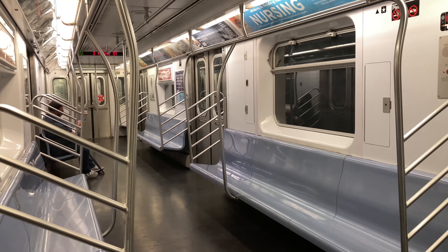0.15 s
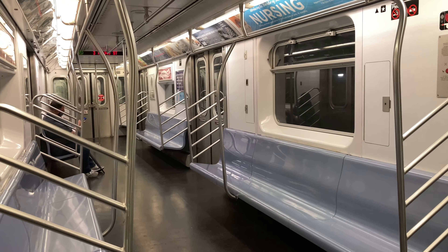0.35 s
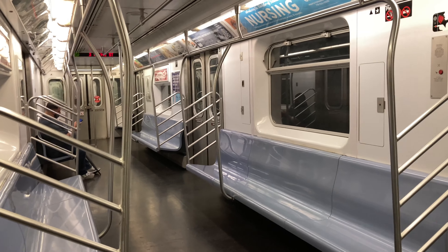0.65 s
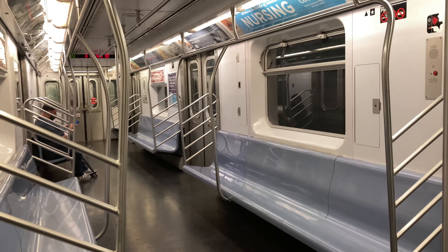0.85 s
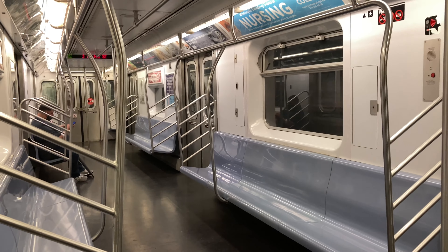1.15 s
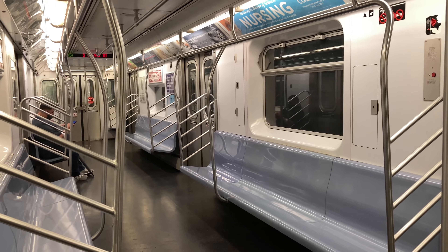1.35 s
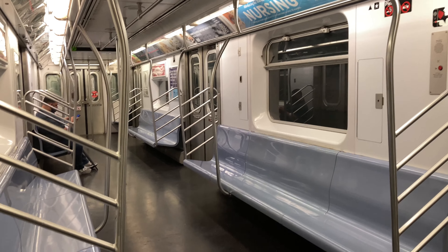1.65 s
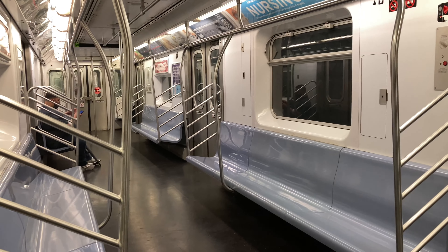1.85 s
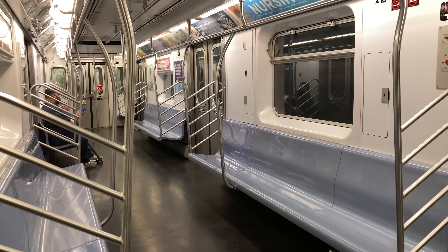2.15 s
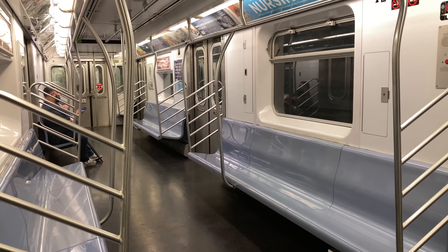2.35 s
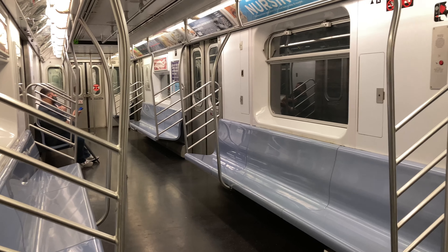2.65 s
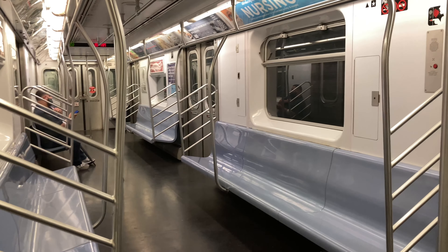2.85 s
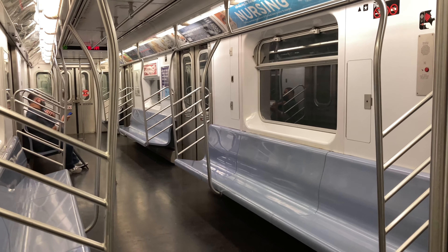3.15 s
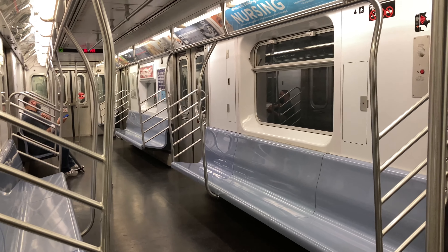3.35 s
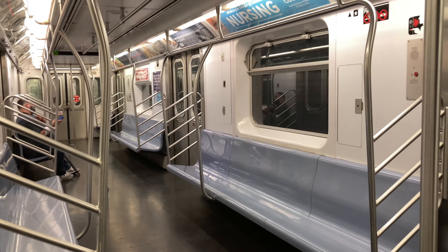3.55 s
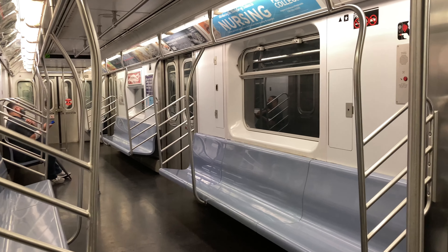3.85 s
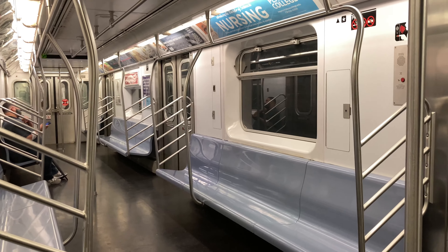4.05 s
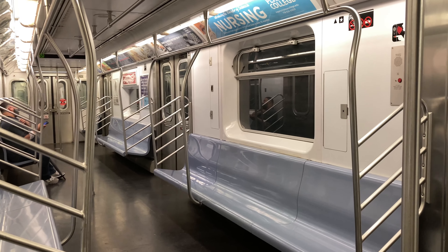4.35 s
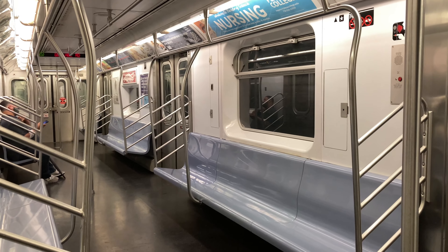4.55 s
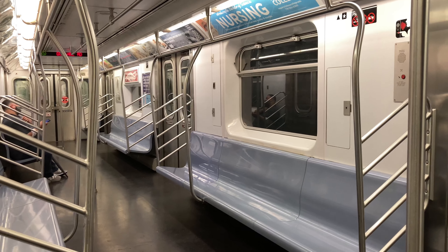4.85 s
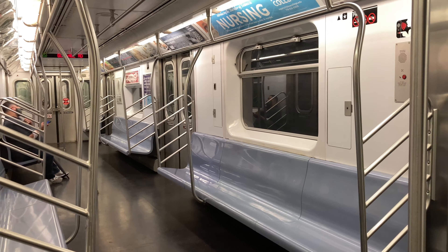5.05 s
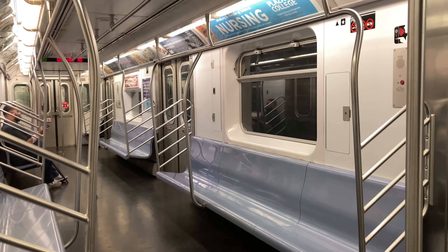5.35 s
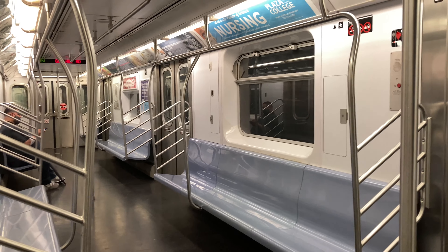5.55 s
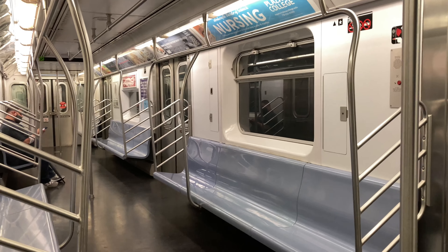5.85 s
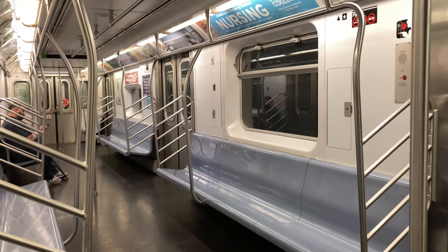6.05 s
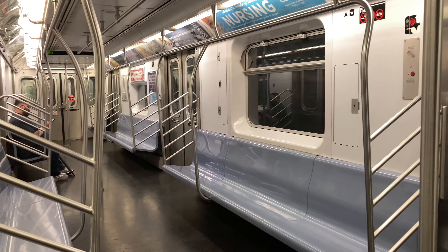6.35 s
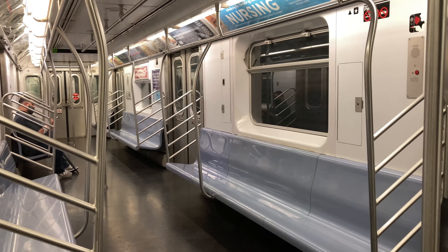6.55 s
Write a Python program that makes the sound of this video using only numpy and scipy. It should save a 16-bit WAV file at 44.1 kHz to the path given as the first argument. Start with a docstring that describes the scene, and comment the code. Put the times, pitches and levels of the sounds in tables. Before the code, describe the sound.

Heard from inside a nearly empty subway car in a tunnel, in wide stereo: continuous deep rumble, droning body, wheel roar and rushing air. Light metallic rattles come early, then floor thumps before two seconds. A dense burst of jolts around three seconds makes the wheels rasp and ring; another sharp jolt with a steel clash lands near four. Afterwards the ride evens out, with faint squeals and a late hiss.

```python
"""Subway ride through a tunnel

Heard inside the car, at two closely spaced microphone ports. Air rushes past and electronics whine faintly.
The trucks rumble and the car body drones: noise passed through low resonances. The wheels roar, rasp,
ring and hiss: noise that follows the roughness of the rail. Dull jolts are single pulses that ring the floor.
Flanges squeal briefly, panels boom, and loose steel fittings clash: short swells or bursts of filtered noise."""
import sys
import numpy as np
from scipy import signal
from scipy.fft import rfft, irfft, next_fast_len
from scipy.io import wavfile
from scipy.ndimage import uniform_filter1d, minimum_filter1d, map_coordinates

SR = 44100
rng = np.random.default_rng(int(sys.argv[2]) if len(sys.argv) > 2 else 0)


def put_to_file(sound):
    """Save the sound as 16-bit audio at rate SR, in the file named by the first command-line argument."""
    columns = np.atleast_2d(sound).T  # one column per channel
    safe = np.clip(columns, -1, 1)
    whole_steps = np.round(safe * 32767)
    wavfile.write(sys.argv[1], SR, whole_steps.astype(np.int16))


N = 295911  # length in samples

# All levels are relative until the layers are mixed.
# Air rushing past, its spectrum: f/Hz, level/dB
AIR_SPECTRUM = [(250, -9.5), (550, -2.5), (700, -5), (830, -5), (1100, -8), (1500, -9.5), (3000, -20.5),
                (8000, -99)]
# Whine of the traction electronics: f/Hz, rms level/dB before it wavers
WHINE_LINES = [(10343, -68.5), (10525, -61.5)]
# Wheel modes that sing when rubbed: middle t/s, length/s, f/Hz, width/Hz of one filter pass, level/dB
FLANGE_SQUEALS = [(.12, .45, 3700, 300, -41), (.47, .16, 4000, 400, -38), (.68, .22, 3680, 200, -43),
                  (1.0, .22, 3460, 260, -40.5), (2.0, .6, 2570, 300, -40), (2.58, .14, 5820, 160, -53),
                  (2.75, .26, 5450, 200, -46.5), (3.1, .2, 5280, 300, -47), (3.55, .3, 5780, 200, -49),
                  (4.03, .45, 8100, 600, -41.5), (4.85, 0.84, 6200, 240, -46.5), (5.11, .2, 6190, 190, -41),
                  (5.25, .34, 6160, 200, -46), (6.15, .8, 3700, 1000, -41), (6.68, .3, 7400, 140, -53.5)]
# Loose steel fittings clashing: t/s, level/dB
STEEL_CLASHES = [(0.424, -29), (.6, -38), (.84, -41), (1.63, -35), (1.8, -31.5), (2.66, -35), (3.06, -39),
                 (3.918, -26), (4.11, -33)]
# Spectrum of a clash: f/Hz, level/dB
STEEL_SPECTRUM = [(500, 2), (1400, 8), (2600, 15), (4300, 12.5), (6800, 3.5), (8300, 4.5), (9500, -6),
                  (12500, 0), (15000, -19)]
# Blows from the track: t/s, level/dB
TRACK_BLOWS = [(1.558, -9.5), (1.696, -8), (1.796, -10), (1.944, -3.5), (2.123, -20), (2.196, -10),
               (2.753, -6), (2.841, -8), (2.866, -3.5), (3.008, -1.5), (3.059, -3), (3.086, -9),
               (3.152, -7), (3.212, -4.5), (3.231, -4), (3.243, -8), (3.252, -9), (3.921, -5), (3.944, -24),
               (4.104, -7), (4.215, -6), (4.448, -19), (5.486, -16), (5.708, -10.5)]
# Floor resonances rung by the blows: f/Hz, width/Hz, level/dB
FLOOR_MODES = [(75, 20, -7.5), (268.4, 29, 1), (405, 69, -4.5)]
# Panels set booming by the track: middle t/s, length/s, f/Hz, width/Hz of one filter pass, level/dB
PANEL_BOOMS = [(.3, .26, 72, 24, -18.5), (.52, 0.14, 80, 20, -16), (.76, .2, 80.5, 22, -18.5),
               (.42, .2, 220, 80, -23), (.76, .22, 250, 110, -22), (1.22, 0.76, 81.4, 12, -16.5),
               (1.55, 0.35, 330, 140, -22), (1.65, 0.15, 83, 9.1, -16.5), (1.7, .18, 130, 26, -22),
               (1.84, 0.15, 198, 15, -16.5), (1.96, 0.166, 391, 55, -22), (2.12, .3, 280, 130, -24),
               (2.35, 0.14, 124, 25, -20), (2.69, .18, 124.7, 17, -17.5), (2.82, 0.48, 325, 130, -15.5),
               (2.92, 0.22, 76, 26, -22), (3.15, 0.37, 293, 114, -16.5), (3.1, .2, 63.3, 40, -17),
               (3.95, .17, 300, 120, -14), (4.17, 0.44, 300, 90, -20.5), (5.51, 0.19, 60, 33, -17),
               (5.49, .16, 122, 14, -19.5), (5.96, .15, 71.7, 24, -21.5), (6.14, 0.17, 120.6, 12, -19),
               (6.33, .15, 121, 12, -20), (6.6, .13, 85, 40, -21.5), (6.68, .16, 315, 30, -21)]
# How hard the trucks shake the car: t/s, level/dB
TRUCK_SHAKING = [(0, -20.5), (.3, -22), (1.5, -24), (2.1, -25), (2.4, -23.5), (3.2, -28), (3.6, -29),
                 (4.4, -29.5), (5.3, -27.5), (5.7, -23), (6.2, -27), (6.71, -26)]
# Rumble of the trucks, its spectrum: f/Hz, level/dB
RUMBLE_SPECTRUM = [(12, -30), (25, -14), (40, 0.5), (62, 3.5), (75, 4), (92, 0), (105, -1), (150, -3),
                   (300, -29)]
# Resonances of the car's shell: f/Hz, width/Hz, level/dB
SHELL_MODES = [(123.8, 10.5, 0), (167, 33, -14), (190, 9.6, -4)]
# Roughness of the rail under the wheels: t/s, level/dB
RAIL_ROUGHNESS = [(0.0, -32), (0.32, -31), (0.39, -31.5), (0.46, -29), (0.64, -28.5), (1.04, -31),
                  (1.35, -30.5), (1.5, -29), (1.83, -27), (2.12, -26), (2.52, -31.5), (2.65, -30.5),
                  (2.69, -27), (2.83, -28), (2.87, -24.5), (3.04, -25), (3.07, -23.5), (3.19, -27),
                  (3.24, -25.5), (3.29, -27), (3.42, -27.5), (3.53, -31.5), (3.7, -34), (3.81, -31),
                  (3.85, -32.5), (3.925, -23.5), (4.06, -26.5), (4.12, -25.5), (4.45, -31.5), (5.27, -32),
                  (6.0, -28.5), (6.45, -31.5), (6.71, -29.5)]
SMOOTH_RAIL_DB = -31.5  # roughness of ordinary rail
# Spectra of wheel roar, rasp and hiss: f/Hz, level/dB
ROAR_SPECTRUM = [(100, -24), (165, -4.5), (225, -2), (255, -1), (274, 0), (290, -.5), (310, 0), (340, -2.5),
                 (390, -4), (500, -7), (600, -10), (720, -14), (1000, -18), (5000, -62)]
RASP_SPECTRUM = [(400, -17), (700, 2.5), (830, 3), (1050, 1), (1400, -0.5), (2000, 1.5), (2400, 0),
                 (2700, 0.6), (3200, -3.5), (4300, -7), (5200, -15), (6500, -15), (10000, -53)]
HISS_SPECTRUM = [(3000, -12), (4600, -3), (5500, -.5), (7000, -0.5), (8300, 0), (9300, -1.5), (10300, -3),
                 (11500, -5), (13000, -7.5), (14500, -22), (16000, -22)]
# Wheel resonances that ring on rough rail: f/Hz, width/Hz of one filter pass, level/dB
WHEEL_MODES = [(2600, 440, 4), (4410, 520, -0.5), (5190, 610, -3.5)]
# Rough spots where the rasp surges: middle t/s, length/s, level/dB
RASP_SURGES = [(.45, .12, -31), (.63, .07, -33), (1.82, .07, -26), (2.89, 0.098, -31), (3.075, .07, -25),
               (3.24, .05, -30), (3.96, .12, -26.5), (4.12, .05, -31)]
# Flanges brushing the rail with a dry hiss: middle t/s, length/s, level/dB
FLANGE_BRUSHES = [(0.107, 0.42, -44.5), (.66, .3, -50), (1.5, 0.45, -42), (3.6, 0.19, -46),
                  (4.08, 0.45, -52), (5.6, 1, -50), (6.335, 0.76, -39)]
# How layers follow the rail: start level/dB on ordinary rail, change/dB per dB of roughness, drift/(dB/s)
BOOM_LAW = (-27.5, 0.036, -1.07)
DRONE_LAW = (-23.5, -0.1, 0.11)
ROAR_LAW = (-19.5, 1.08, -0.62)
RASP_LAW = (-30.5, 1.15, -0.049)
RING_LAW = (-51, 2.8, -0.2)
HISS_LAW = (-47.5, 1, -.05)
# Likeness of the two ports: f/Hz, likeness from -1 to 1 (larger values count as nearly 1)
PORT_LIKENESS = [(110, 1), (130, 0.95), (290, 0.83), (520, 0.7), (700, 0.05), (850, 0.34), (1150, 0.42),
                 (1550, -0.3), (2000, -0.23), (2500, 0.09), (5800, 0), (6700, 0.2), (8000, 6), (9000, 9),
                 (13000, 18)]
# Phase by which the left port leads: f/Hz, lead/radians
PORT_LEAD = [(150, 0), (350, .3), (1200, .1), (4500, 0), (6200, 1.2), (7100, 0), (9150, -3.14),
             (11400, -6.28), (13600, -9.42), (15400, -12.5)]
# Left level minus right level: f/Hz, difference/dB
PORT_TILT = [(60, -1), (110, 1), (200, 3), (380, -0.1), (700, 3), (1290, 2), (2380, 0.5), (4400, -0.3),
             (8120, -1), (15000, 0)]
TOP_HZ = 15600  # band limit of the recorder


def amp(db):
    """Turn decibels into a gain."""
    return 10 ** (np.asarray(db) / 20)


def unit(x):
    """Scale a signal to rms 1."""
    return x / np.sqrt(np.mean(x ** 2) + 1e-20)


def along(points, hz):
    """Read a (frequency, value) table on a logarithmic frequency axis."""
    f, values = np.transpose(points)
    return np.interp(np.log(hz + 1), np.log(f + 1), values)


def over_time(rows):
    """Draw a (time, level) table as one value per sample."""
    seconds, levels = np.transpose(rows)
    return np.interp(np.arange(N) / SR, seconds, levels)


def wobble(rate):
    """Make a smooth random curve through `rate` random points a second."""
    knots = rng.standard_normal(int(N * rate / SR) + 4)
    return map_coordinates(knots, [np.arange(N) * rate / SR])


def arch(middle, length):
    """Rise and fall smoothly over `length` seconds around `middle`."""
    return np.cos(np.pi * np.clip((np.arange(N) / SR - middle) / length, -.5, .5))


def arches(rows):
    """Add up the arches of (middle, length, level) rows."""
    return sum(amp(db) * arch(middle, length) for middle, length, db in rows)


def filtered(x, response):
    """Filter x by multiplying its spectrum with a response that depends on frequency."""
    size = next_fast_len(N + SR // 2)  # spare room lets the ringing end
    hz = np.fft.rfftfreq(size, 1 / SR)
    return irfft(rfft(x, size) * response(hz), size)[..., :N]


def colour(points):
    """Make a filter from a spectrum table; it falls off steeply around the last frequency and above."""
    last_hz = points[-1][0]
    return lambda hz: amp(along(points, hz)) / (1 + (hz / last_hz) ** 8)


def resonances(modes):
    """Make a filter that rings at each (frequency, width, level) mode, with alternating signs."""
    def response(f):
        total = 0
        for k, (centre, width, db) in enumerate(modes):
            damping = 1j * f * width
            total = total + (-1) ** k * amp(db) * damping / (centre ** 2 - f ** 2 + damping)
        return total
    return response


def rush(response, patchy_db):
    """Make two noises, rms 1 together, whose narrow pitch bands flare and fade at random."""
    z = signal.stft(rng.standard_normal((2, N)), nperseg=2048)[2]
    patches = uniform_filter1d(rng.standard_normal(z.shape[1:]), size=3, axis=0)  # across pitch
    patches = uniform_filter1d(patches, size=6, axis=1, mode="wrap")  # across time
    pair = signal.istft(z * amp(patchy_db * unit(patches)), nperseg=2048)[1][:, :N]
    return unit(filtered(pair, response))


def sustained(pair, span):
    """Hold the strength of a vibration nearly even, judged over `span` seconds."""
    power = np.abs(uniform_filter1d(pair ** 2, size=int(span * SR), axis=1))
    return pair / np.sqrt(power + 1e-3)


def swells(rows):
    """Let noise drive one resonance per row, swelling and fading over its length."""
    total = np.zeros((2, N))
    for middle, length, hz, width, db in rows:
        b, a = signal.iirpeak(hz, hz / width, SR)
        once = signal.lfilter(b, a, rng.standard_normal((2, N)))
        twice = signal.lfilter(b, a, once)
        total += amp(db) * arch(middle, length) * sustained(unit(twice), span=0.2)
    return total


def ride(law):
    """Give a layer's level in dB: it follows the roughness of the rail and drifts steadily."""
    level_db, growth, drift_db_per_s = law
    roughness_db = over_time(RAIL_ROUGHNESS) - SMOOTH_RAIL_DB
    return level_db + growth * roughness_db + drift_db_per_s * np.arange(N) / SR


def tunnel_air():
    """Air rushes between car and tunnel wall: noise that buffets slightly and slowly eases."""
    level_db = np.linspace(-30.5, -33.5, N) + 0.23 * wobble(14)
    return amp(level_db) * rush(colour(AIR_SPECTRUM), patchy_db=1.8)


def inverter():
    """The traction electronics whine thinly: sine tones that waver in level and phase."""
    t = np.arange(N) / SR
    whine = np.zeros(N)
    for hz, db in WHINE_LINES:
        level = np.sqrt(2) * amp(db + 2.5 * wobble(4.03))  # root 2 turns rms into peak
        whine += level * np.sin(2 * np.pi * hz * t + wobble(18))
    return whine


def flange():
    """Rubbing flanges excite high wheel modes into faint, fluttering squeals."""
    return swells(FLANGE_SQUEALS) * amp(1.5 * wobble(21.98))


def clashes(attack=0.0041, t60=0.87):
    """Steel fittings clash: bright, rattling noise starts fast and fades by 60 dB in t60 seconds."""
    t = np.arange(N) / SR
    strength = np.zeros(N)
    for start, db in STEEL_CLASHES:
        age = np.maximum(t - start, 0)
        strength += amp(db - 60 * age / t60) * (1 - np.exp(-age / attack))
    rattle = amp(1.5 * wobble(70))
    return strength * rattle * unit(filtered(rng.standard_normal((2, N)), colour(STEEL_SPECTRUM)))


def jolts():
    """Each blow from the track is one pulse that rings the floor briefly."""
    blows = np.zeros(N)
    for s, db in TRACK_BLOWS:
        blows[round(s * SR)] = amp(db)
    modes = resonances(FLOOR_MODES)
    floor = lambda hz: modes(hz) / (1 + 1j * hz / 900) ** 2  # dull above 900 Hz
    peak = np.abs(filtered(signal.unit_impulse(N), floor)).max()
    return amp(0.5) * filtered(blows, floor) / peak


def panels():
    """The track sets car panels booming: noise swells in their resonances."""
    return swells(PANEL_BOOMS)


def car_body():
    """The trucks shake the car; the floor booms and the long shell drones at their own resonances."""
    shaking = unit(filtered(rng.standard_normal((2, N)), colour(RUMBLE_SPECTRUM)))
    rumble_db = over_time(TRUCK_SHAKING) + 2.0 + 1.3 * wobble(8.2)
    rumble = amp(rumble_db) * sustained(shaking, span=0.128)

    floor = lambda hz: resonances([(81, 14, 0)])(hz) ** 2  # f/Hz, width/Hz of one pass, level/dB
    boom = amp(ride(BOOM_LAW)) * sustained(rush(floor, patchy_db=-1.0), span=0.24)

    shell = lambda hz: resonances(SHELL_MODES)(hz) / (1 + (hz / 300) ** 4)
    drone_db = ride(DRONE_LAW) + 0.8 * wobble(11)
    drone = amp(drone_db) * sustained(rush(shell, patchy_db=2.0), span=0.17)
    return rumble + boom + drone


def wheels():
    """Rough rail makes the wheels roar and ring; chattering contact roughens rasp, ring and hiss together."""
    chatter = wobble(45)
    roar_db = ride(ROAR_LAW) + 1.27 * wobble(22.13)
    roar = amp(roar_db) * sustained(rush(colour(ROAR_SPECTRUM), patchy_db=1.78), span=0.11)

    # Unrelated strengths add as powers, hence hypot.
    rasp_strength = np.hypot(amp(ride(RASP_LAW)), arches(RASP_SURGES)) * amp(0.7 * chatter)
    rasp = rasp_strength * rush(colour(RASP_SPECTRUM), patchy_db=2.5)

    def modes(hz):
        return sum(amp(db) * resonances([(centre, width, 0)])(hz) ** 2 for centre, width, db in WHEEL_MODES)
    ring = amp(ride(RING_LAW) + 0.87 * chatter) * rush(modes, patchy_db=3.0)

    hiss_strength = np.hypot(amp(ride(HISS_LAW)), arches(FLANGE_BRUSHES))
    hiss_flutter = amp(0.46 * chatter + 1.06 * wobble(25))
    hiss = hiss_strength * hiss_flutter * rush(colour(HISS_SPECTRUM), patchy_db=3.0)
    return roar + rasp + ring + hiss


def at_ports(pair):
    """Blend two unrelated signals into left and right, with set likeness, phase and level at each pitch."""
    def mixed(hz, side):
        turn = np.arccos(np.clip(along(PORT_LIKENESS, hz), -1, .99)) / 2
        level = amp(side * along(PORT_TILT, hz) / 2)
        phase = np.exp(.5j * side * along(PORT_LEAD, hz))
        return level * phase * np.array([np.cos(turn), side * np.sin(turn)])
    left = filtered(pair, lambda hz: mixed(hz, 1)).sum(0)
    right = filtered(pair, lambda hz: mixed(hz, -1)).sum(0)
    return np.array([left, right])


def scene():
    """Diffuse running noise fills the car; jolts and whine reach both ports alike."""
    running = car_body() + panels() + wheels() + tunnel_air() + flange() + clashes()
    return at_ports(running) + jolts() + inverter()


def record(dry):
    """A limiter eases down the highest peaks; a steep filter cuts what lies above the band limit."""
    needed = np.minimum(1, .93 / (np.abs(dry).max(0) + 1e-9))
    gain = uniform_filter1d(minimum_filter1d(needed, size=400), size=400)
    low_pass = signal.ellip(10, .1, 90, TOP_HZ, fs=SR, output="sos")
    return signal.sosfilt(low_pass, dry * gain)


dry = scene()
out = record(dry)
put_to_file(out)
```